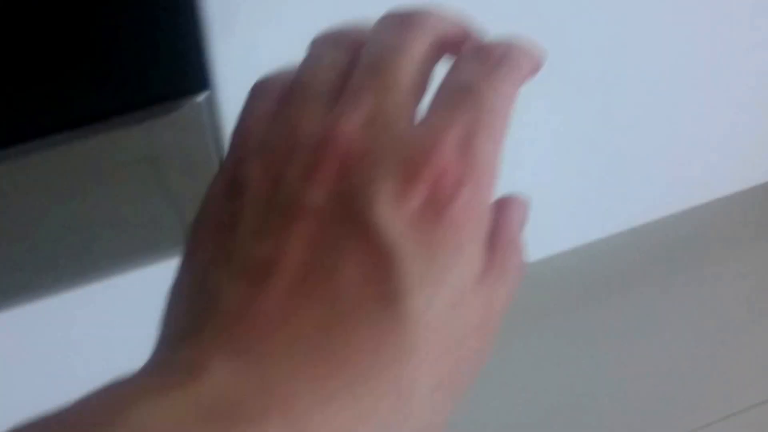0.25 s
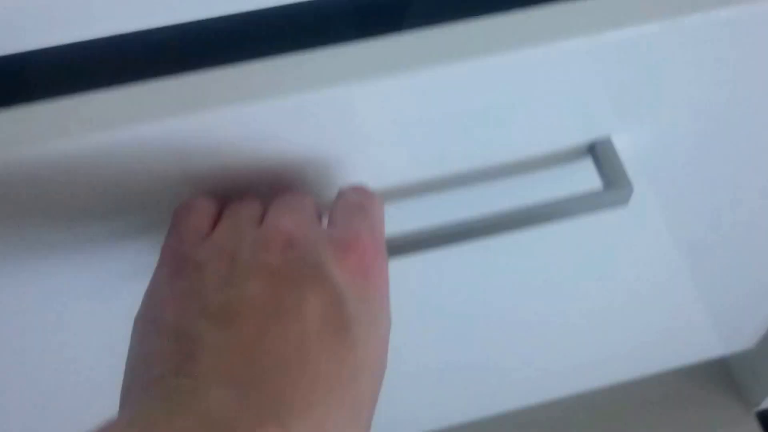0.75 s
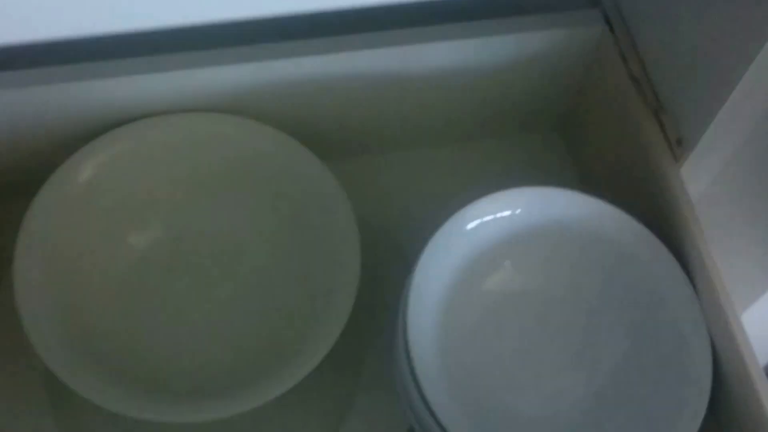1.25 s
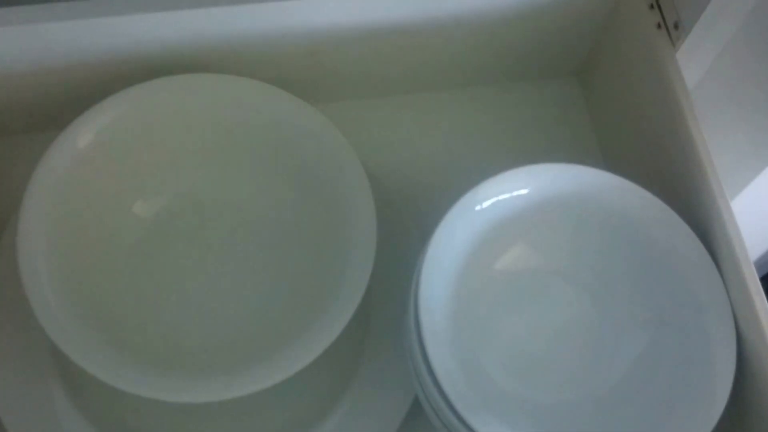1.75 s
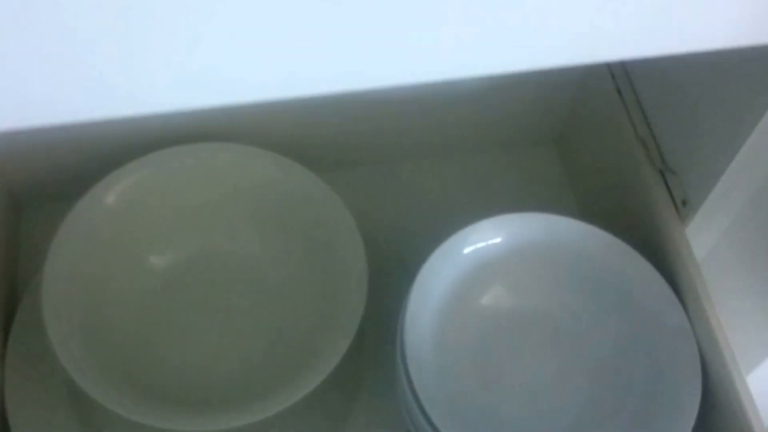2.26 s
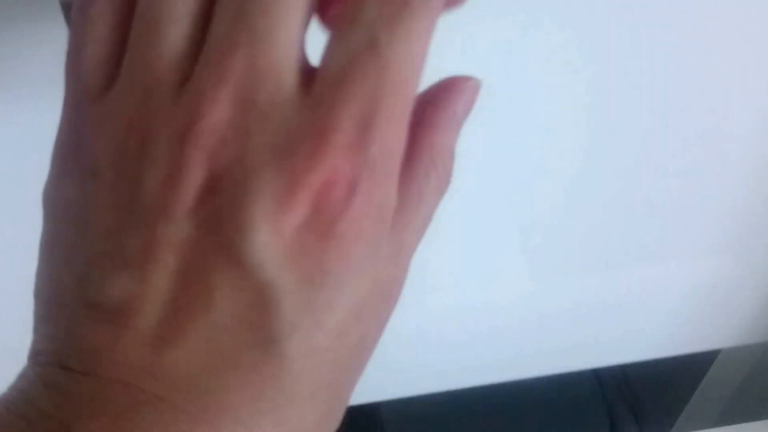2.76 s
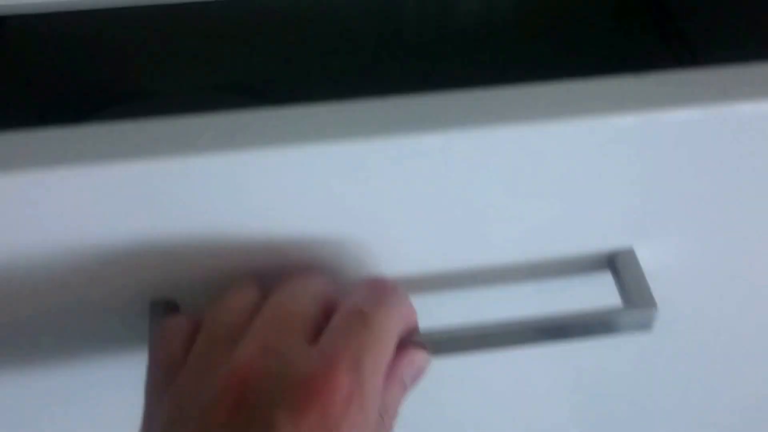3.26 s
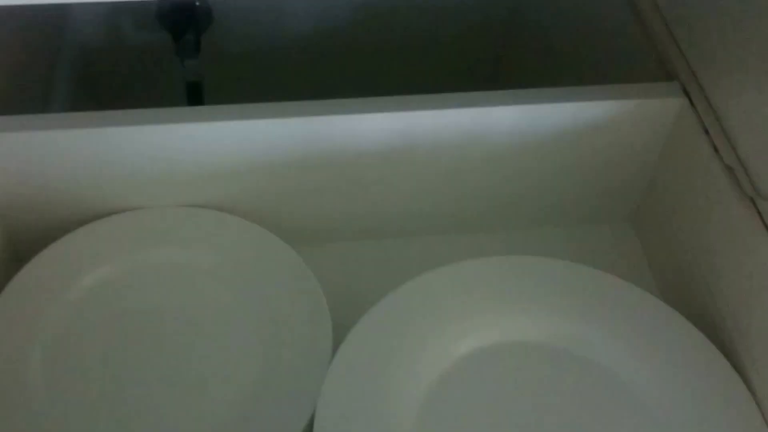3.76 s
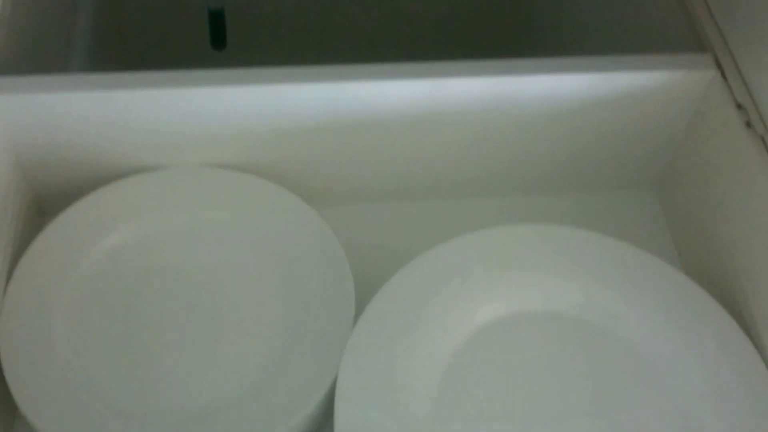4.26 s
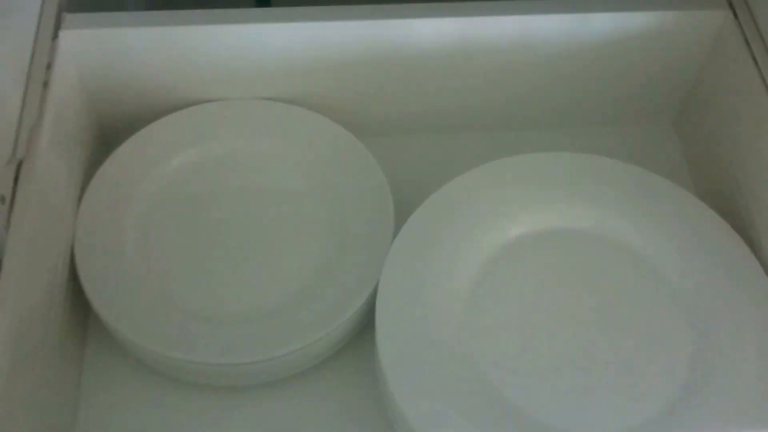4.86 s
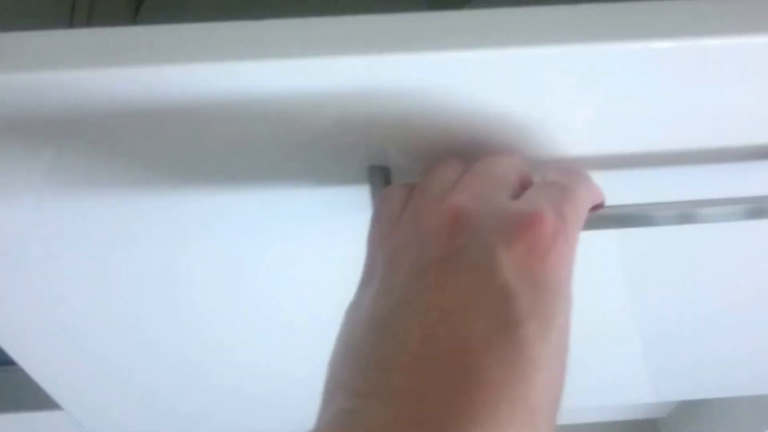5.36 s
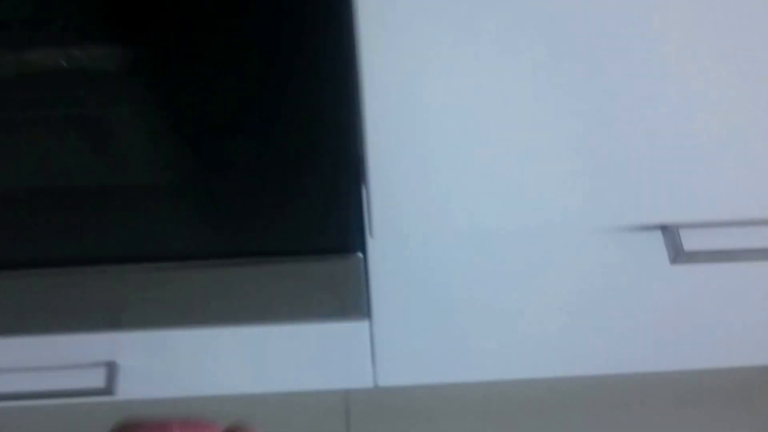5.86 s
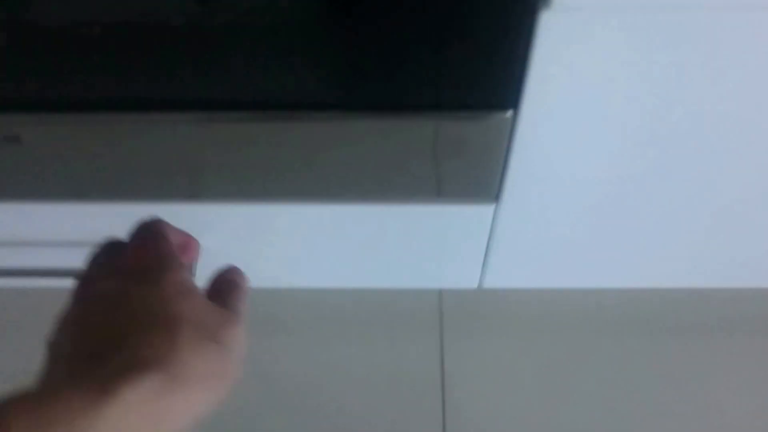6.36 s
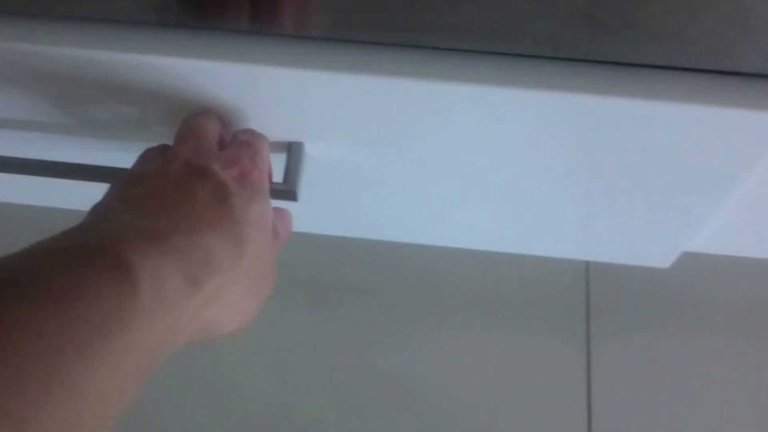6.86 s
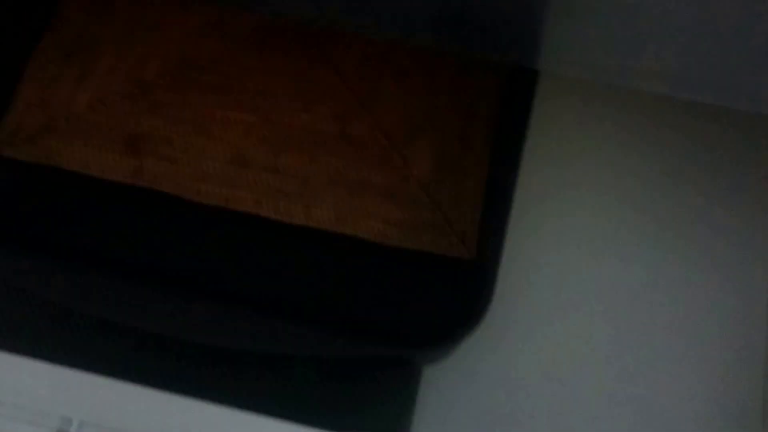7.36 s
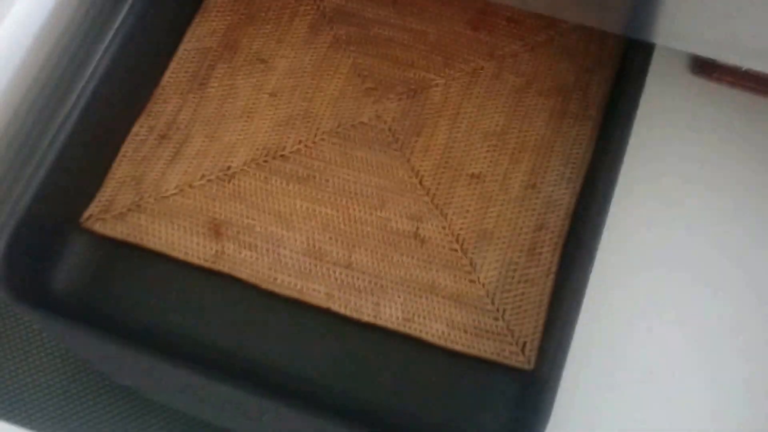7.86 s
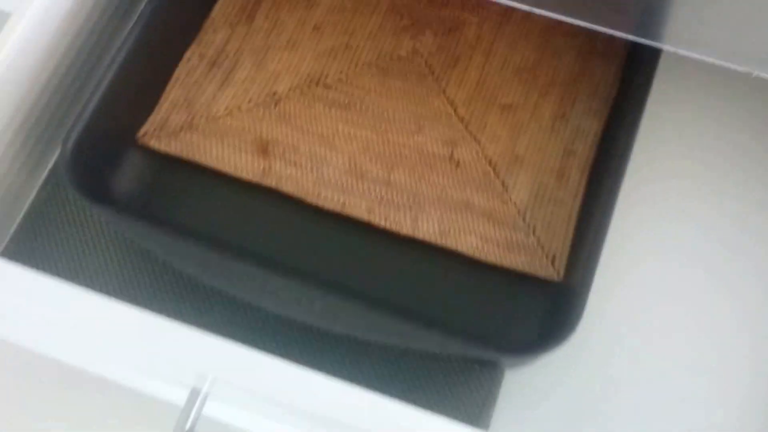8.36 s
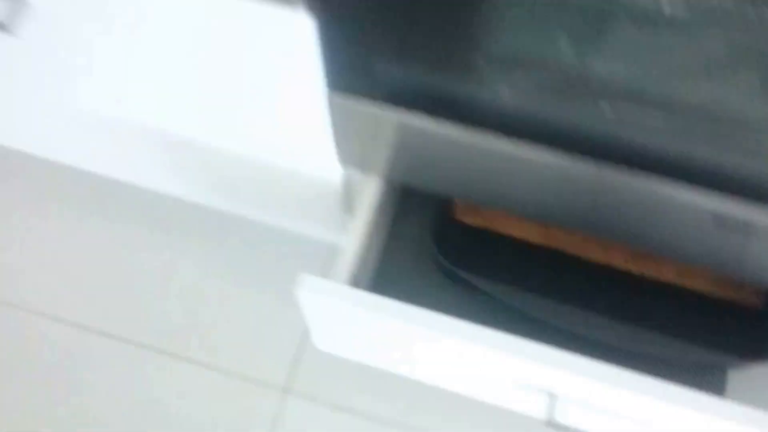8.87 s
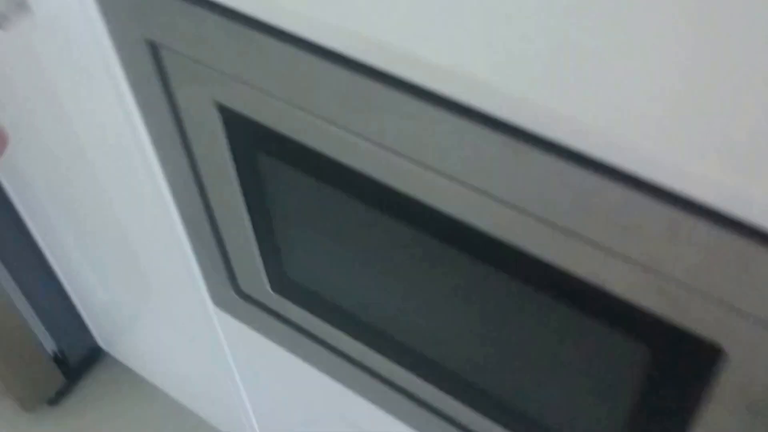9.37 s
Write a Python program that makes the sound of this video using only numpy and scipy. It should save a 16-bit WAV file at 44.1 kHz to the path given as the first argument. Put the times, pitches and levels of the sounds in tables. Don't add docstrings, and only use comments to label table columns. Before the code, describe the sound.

In a quiet, hard-walled kitchen with barely audible fridge hum, a close handheld microphone catches a heavy drawer already rolling. At 0.13-0.26 s it hits its stop in a cluster of thuds, hollow knocks and plate rattle, leaving a faint ring. Rolling resumes near 0.8, with a lighter clack at 1.1, then a bright, hard ceramic crash at 1.6 and clinking plates settling until about 2. Soft rumbling, ticks and low finger bumps on the microphone come around 2.5-2.7. At 3.1-3.2 a deeper drawer slams boomily, plates jangling; thumps follow at 3.4 and 3.65, then a quiet lull. Rolling resumes at 4.8, thumps around 5.2, and a massive low slam lands at 6.2. After a sleeve rustle, a tray drawer rumbles from 7, with thin metallic clacks and a scratch at 7.6, a sharper clack at 8.65, sliding, and a final dull double knock at 9.55.

```python
import sys
import numpy as np
from scipy import signal
from scipy.fft import rfft, irfft, next_fast_len
from scipy.io import wavfile
from scipy.ndimage import uniform_filter1d

SR = 44100
rng = np.random.default_rng(int(sys.argv[2]) if len(sys.argv) > 2 else 0)


def decibels_to_gain(level_db):
    exponent = np.asarray(level_db, float) / 20
    return 10 ** exponent


def persist_wave(psi):
    counts = np.round(np.clip(psi, -1, 1) * 32767).astype(np.int16)
    wavfile.write(sys.argv[1], SR, np.atleast_2d(counts).T)


N = 423801
HZ = np.fft.rfftfreq(next_fast_len(N + SR), 1 / SR) + 1e-3
TRAYS_FROM_S = 6.5
QUARTER = np.array([[0], [np.pi / 2]])

# (frequency [Hz], rms level [dB])
FRIDGE = [(86.1, -68), (177.6, -69), (263.8, -70.5), (349.9, -76), (441.4, -77), (528, -87)]
# (frequency [Hz], density [dB per Hz])
AIR_COLOUR = [(250, -10), (500, -3), (2400, -6.5), (4000, -10), (6400, -17), (8000, -17.5), (11000, -28),
              (15500, -31)]
# (time [s], length [s], box at the start [dB], box at the end [dB], load re box [dB])
TRAVELS = [(-.05, 0.32, -35, -43, -16), (0.789, 0.36, -37, -30, -12.5), (1.155, 0.48, -33, -41, -12.5),
           (2.117, 0.31, -31.5, -36.5, -19.5), (2.396, 0.77, -37.5, -44, -14), (3.388, 0.8, -33, -49, -21),
           (4.806, 0.4, -44.5, -37, -16.5), (5.234, 0.43, -31.5, -50.5, -18),
           (5.5, 0.98, -49.5, -48.5, -15.5), (6.46, 0.89, -55.5, -64.5, -3.5),
           (7.029, 0.59, -35, -31.5, -17), (7.76, 0.36, -43.5, -49.5, -19.5),
           (8.294, 0.54, -39, -37.5, -18), (8.778, 0.73, -44.5, -40.5, -16.5)]
# (time [s], carcass [dB], box [dB], panel [dB], t60 [s])
JOLTS = [(0.132, -16.5, -34, -25.5, 1.4), (0.234, -23.5, -16.5, -14, 0.37), (1.1, -50, -39, -35.5, 5.8),
         (1.6, -15.5, -6.5, -9.5, 0.3), (1.701, -39, -27.5, -25.5, 1.4), (2.674, -27, -30, -37, 1.13),
         (3.091, -32, -27, -18.5, 0.34), (3.161, -18.5, -17.5, -16.5, 0.95),
         (3.651, -44, -28.5, -36.5, 1.4), (5.199, -49, -34, -38, 0.33), (6.207, -18, -18.5, -26, 0.51),
         (7.599, -48, -36.5, -59, .4), (8.645, -34, -26.5, -55, 0.24), (9.535, -22, -22.5, -27, 1)]
# (from time [s], frequency [Hz], width [Hz])
BOXES = [
    (0, 262, 55),
    (3.1, 192, 45),
    (6.5, 240, 140),
]
# (frequency [Hz], width [Hz], level [dB])
CARCASS = [(62.4, 18, -3), (79.6, 14, -1), (123, 73, -16)]
# (frequency [Hz], width [Hz], level [dB])
PANEL = [(421.3, 230, 28), (550, 20, 6.4), (775, 35, 10)]
# (time [s], plates [dB], metal [dB], t60 [s])
SHAKES = [(0.133, -36.5, -34.5, 1.3), (0.238, -22.5, -33, 0.31), (1.13, -34, -34.5, 0.46),
          (1.608, -58, -8.5, 0.24), (1.68, -30.5, -31, 0.96), (2.674, -43.5, -41, 0.63),
          (3.086, -30, -61.5, 0.25), (3.159, -13, -21, 0.33), (3.25, -34.5, -43, 1.43),
          (3.65, -33, -47, 0.73), (5.199, -65, -51.5, 0.94), (6.205, -29.5, -22, 0.53),
          (7.602, -50, -65, 0.22), (8.644, -43.5, -42.5, 0.46), (9.535, -35.5, -79, .6)]
# (time [s], length [s], start level [dB], end level [dB])
SLEEVE = [
    (-.05, 0.14, -62, -63.5),
    (2.298, .36, -68, -71),
    (6.45, .36, -71.5, -64.5),
    (8.33, 0.25, -60.5, -71),
    (8.712, 0.294, -61, -69),
    (9.232, 0.54, -62, -66),
]
# (time [s], length [s], start level [dB], end level [dB], t60 [s])
GRIT = [
    (0.22, 0.074, -40.5, -37, 0.27),
    (7.628, 0.011, -49.5, -50, .06),
    (7.66, .01, -52, -52, .06),
    (11, .06, -52.5, -57, .3),
    (.183, .006, -45, -52.5, .06),
]
# (frequency [Hz], density [dB per Hz])
CHATTER_COLOUR = [(500, -17.5), (800, -1.5), (1300, 5), (2250, 5.5), (3500, -9.5), (6400, -17.5),
                  (11000, -38.5), (16000, -51)]
# (frequency [Hz], level [dB], t60 [s])
PLATES = [(1000, 1.5, 0.02), (1274, -4, 0.099), (1460, -3, 0.35), (1830, -2.5, 0.75), (2200, -7, 1),
          (2984, -11, 0.13), (3790, -4.5, 0.2), (6500, -12.5, 0.097)]
# (frequency [Hz], level [dB], t60 [s])
TRAYS = [(2770, 7, 0.099), (3770, 6.5, 0.14), (5185, -28, 0.03), (6780, -16, 0.027)]
# (time [s], peak level [dB], treble re peak [dB], rattle time [s])
TICKS = [(0.032, -22.5, -11, 0.003), (0.102, -29, -25, 0.0025), (0.852, -33, -18, 0.0065),
         (1.169, -27, -19, 0.0028), (1.342, -36.5, -40.5, 0.029), (1.56, -37, -19, 0.0093),
         (1.19, -25.5, -15, 0.018), (2.155, -40, -49, 0.0024), (2.261, -28.5, -32.5, 0.018),
         (2.704, -25.5, -12, 0.015), (2.395, -28, -41, 0.01), (2.417, -30.5, -10, 0.027),
         (2.459, -26, -21, 0.029), (2.556, -26.5, -13.5, 0.028), (2.624, -32.5, -34.5, 0.025),
         (3.556, -28, -15.5, 0.048), (3.732, -22, -24.5, 0.013), (3.792, -27, -11, 0.0025),
         (3.849, -41, -15.5, 0.011), (8.642, -30, -1, 0.005), (3.13, -38.5, -2.5, 0.02),
         (4.066, -47, -29.5, 0.0033), (4.125, -38.5, -29.5, 0.014), (5.172, -49, -0.5, 0.0085),
         (5.515, -41.5, -28, 0.021), (5.263, -34.5, -15.5, 0.015), (5.625, -41, -25.5, 0.01),
         (5.359, -44.5, -15.5, 0.0066), (5.75, -39, -12, 0.0099), (5.961, -45, -43.5, 0.0074)]
# (time [s], peak level [dB], treble re peak [dB], rattle time [s])
CRASHES = [(0.134, -11, -10.5, 0.017), (0.205, -5, -30, 0.005), (0.241, -14.5, -16, 0.04),
           (0.262, -17.5, -6.5, 0.06), (1.131, -23.5, 0, 0.017), (1.6, -12.5, -11, 0.026),
           (1.618, 1, -3, 0.0089), (1.636, 3.5, -25, 0.019), (1.651, -3.5, -11.5, 0.018),
           (1.666, -5, -12.5, 0.015), (2.674, -17.5, -6.5, 0.018), (3.09, -16.5, -25, 0.00853),
           (3.158, 5.5, -16.5, 0.016), (3.189, -7, -18, 0.015), (3.203, -6, -15.5, 0.017),
           (3.218, -5.5, -15, 0.012), (3.236, -11.5, -14.5, 0.0093), (3.328, -25.5, -16, 0.058),
           (3.647, -22, -8.5, 0.022), (3.663, -21.5, -14, 0.049), (5.203, -28.5, -22.5, 0.035),
           (6.201, -7.5, -16, 0.016), (6.21, 4, -21, 0.009), (6.235, -5.5, -9, 0.025),
           (6.331, -23.5, -10.5, 0.073), (8.647, -19, -4, 0.011), (8.676, -27.5, -0.5, 0.0155),
           (9.534, -18, -8.5, 0.0184), (9.565, -21, -12.5, 0.016)]
# (time [s], peak level [dB], treble re peak [dB], rattle time [s])
TRAY_TICKS = [(6.737, -41.5, -7, 0.055), (6.764, -54.5, 14, 0.018), (6.854, -38.5, -7.5, 0.011),
              (7.058, -42, -9.5, 0.056), (7.316, -38.5, -10.5, 0.064), (7.466, -43, -4, 0.006),
              (7.594, -23.5, -12.5, 0.016), (7.631, -23, 1, 0.0086), (7.663, -25.5, 1, 0.0089),
              (7.695, -28, -1.5, 0.013), (8.2, -40, -25.5, 0.013), (8.362, -37.5, -19, 0.035),
              (8.402, -31, -11, 0.0061), (8.571, -28.5, -13, 0.0063), (8.585, -33, -10, 0.0074),
              (8.76, -36, -3, 0.014), (9.232, -42.5, -6, 0.028), (9.268, -34, -32, 0.008),
              (9.445, -45.5, 8, 0.0059), (9.498, -51, 12, 0.005)]
# (frequency [Hz], density [dB per Hz])
CRASH_COLOUR = [(200, -28.5), (350, -8), (600, -5.5), (2100, -0.5), (4500, -11.5), (7000, -20),
                (11000, -37.5), (15500, -41)]
# (frequency [Hz], t60 [s])
ROOM_T60 = [(100, 0.33), (1000, 0.63), (4000, 0.6), (12000, 0.19)]
# (time [s], peak level [dB], pitch [Hz], t60 [s])
KNOCKS = [(.135, -17, 775, 0.1), (.137, -29, 1000, 0.52), (0.205, -15.5, 310, 0.13), (.205, -24, 1103, 0.1),
          (0.263, -13.5, 550, 0.16), (.78, -20.5, 321.4, 0.19), (3.091, -4.5, 547, 0.1),
          (3.09, -14, 806, 0.039), (3.108, -14.5, 537, 0.076), (5.203, -34, 707, 0.053),
          (5.205, -29.5, 487, 0.13), (5.276, -37.5, 800, 0.053), (6.212, -12, 1084, 0.044),
          (6.232, -14, 376, 0.16), (3.09, -10, 364, 0.12), (5.961, -44, 1146, 0.056),
          (0.254, -23, 1772, 0.09), (.26, -15.5, 844, 0.17), (.285, -17.5, 1035, 0.081),
          (6.21, -3, 483, 0.066), (6.212, -6, 810, 0.039), (6.204, 7, 274, 0.029),
          (9.566, -30.5, 434, 0.17),
          (0.15, -25, 980, 0.057), (0.179, -28, 980, 0.05), (1.08, -23, 440, 0.07),
           (1.313, -30.5, 1100, 0.034), (1.638, -6, 603, 0.13), (1.65, -17, 1170, 0.041),
           (1.852, -21, 630, 0.05), (1.914, -23.5, 680, 0.041), (1.949, -27.5, 594, 0.07),
           (2.22, -27.5, 435, 0.071), (2.684, -22, 470, 0.065), (2.695, -29.5, 843, 0.14),
           (3.132, -9.5, 359, 0.2), (3.16, -14.5, 1206, 0.068), (3.16, -12, 800, 0.046),
           (3.185, -13.5, 586, 0.057), (3.208, -9.5, 1046, 0.042), (3.667, -23.5, 572, 0.12),
           (5.432, -44, 904, 0.046), (7.203, -30, 462, 0.095), (7.274, -30, 360, 0.05),
           (7.396, -31, 557, 0.058), (7.421, -31.5, 342, 0.05), (7.477, -30, 564, 0.074),
           (7.566, -30, 570, 0.05), (7.596, -20, 393, 0.045), (7.665, -25, 405, 0.04),
           (7.778, -37.5, 596, 0.075), (9.535, -28, 969, 0.05), (9.568, -23, 864, 0.079),
           (9.573, -20, 430, 0.14), (9.574, -27.5, 1180, 0.068)]
# (time [s], peak level [dB], pitch [Hz])
THUDS = [(0.136, -9.5, 102.6), (0.206, -9.5, 81.3), (0.243, -8, 112.6), (0.782, -27.5, 295),
         (1.135, -14.5, 259.2), (1.601, -1, 257), (1.618, -4.5, 502), (2.672, -19, 199), (3.093, -8.5, 367),
         (3.159, 5.5, 91.2), (3.383, -12, 187), (3.646, -6, 191.6), (5.031, -14.5, 194), (5.193, -11, 192),
         (6.203, -1.5, 84), (6.215, 5, 113), (7.087, -14, 116), (7.594, -14, 209), (7.632, -12, 222),
         (8.647, -12, 253.2), (9.536, -11.5, 98), (9.566, -14, 53.03)]
# (time [s], level [dB], t60 [s])
GRIP = [
    (.14, -31.5, 0.68),
    (2.56, -36.5, 0.59),
    (8.95, -45, 0.85),
]
# (time [s], peak level [dB], pitch [Hz], t60 [s])
CLINKS = [(0.205, -19.5, 1796, 0.04), (0.243, -14, 1413, 0.061), (0.271, -13, 1793, 0.06),
          (1.134, -26, 5450, 0.066), (1.618, -15.5, 1674, 0.12), (1.621, -17, 5160, 0.05),
          (1.621, -12, 6433, 0.077), (1.628, -12, 4780, 0.056), (1.634, -3, 2154, 0.078),
          (1.635, -10, 3740, 0.048), (1.65, -13.5, 6296, 0.042), (1.654, -13, 3076, 0.088),
          (1.655, -10.5, 4485, 0.1), (1.665, -11.5, 4210, 0.075), (1.666, -11, 3790, 0.05),
          (1.697, -14, 1378, 0.046), (1.729, -25, 2170, 0.041), (1.948, -29, 2196, 0.04),
          (2.677, -27, 1325, 0.079), (3.091, -17, 2080, 0.037), (3.091, -15, 1470, 0.042),
          (3.091, -23, 3500, .05), (3.156, -5, 2266, 0.054), (3.161, -13.5, 3073, 0.086),
          (3.161, -16, 3563, 0.096), (3.166, -10, 1836, 0.031), (3.205, -19, 3185, 0.05),
          (3.216, -14, 2176, 0.039), (3.219, -14.5, 1289, 0.13), (3.662, -25, 1975, 0.061),
          (3.661, -23, 3760, 0.085), (6.209, -6.5, 1664, 0.037), (6.211, -16.5, 3075, 0.092),
          (6.213, -14.5, 2040, 0.045), (6.213, -24, 3670, 0.05), (6.238, -25, 3133, 0.05),
          (7.633, -25, 2600, 0.048), (7.632, -24, 3810, 0.034), (7.665, -35, 6100, 0.046),
          (7.666, -40, 7020, 0.053), (.277, -25.5, 4880, .04), (1.992, -37.5, 2170, 0.05),
          (2.314, -48, 7500, .12), (7.697, -33.5, 3690, 0.029), (8.648, -30.5, 1526, 0.079),
          (8.648, -14.5, 6830, 0.021), (8.678, -30, 6500, 0.044), (9.536, -26, 2520, 0.054),
          (6.251, -18, 3950, 0.056), (6.272, -26, 3800, 0.074)]
# (time [s], peak level [dB], pitch [Hz], t60 [s])
SETTLING = [(1.715, -24, 1485, .12), (1.76, -24, 1378, 0.23), (1.79, -22, 1502, 0.14),
            (1.81, -23.5, 2180, 0.052), (1.845, -26.5, 1402, 0.072), (1.912, -31.5, 2220, 0.052),
            (3.24, -12, 1271, 0.056), (3.309, -24.5, 1274, 0.17), (6.335, -32, 6390, 0.11),
            (6.25, -17, 2940, .08), (6.34, -31, 1920, 0.13)]
# (time [s], peak level [dB], pitch [Hz], t60 [s])
HANDLES = [
    (0.44, -34.5, 468, 2.1),
    (0.57, -44.5, 970, 1.1),
    (.3, -33, 180, 2.07),
]
# (time [s], peak level [dB], pitch [Hz], t60 [s])
BUMPS = [
    (2.536, -11.5, 80.5, 0.073),
    (2.578, -32, 85, 0.23),
    (2.616, -22, 72.4, 0.084),
    (2.655, -17, 88, 0.098),
    (9.036, -34, 88, 0.27),
    (9.177, -38, 57, 0.22),
]
# (frequency [Hz], difference over sum [dB])
PORTS = [(40, 24), (125, 16.5), (250, 19.5), (500, 13.5), (1000, 6), (2000, -1), (12000, 0)]
# (frequency [Hz], phase [rad])
TURNS = [(900, 3.0), (1900, 2.0), (2700, 3.74)]
# (frequency [Hz], level [dB])
MICROPHONE = [(3500, -1), (5100, -4.5), (6300, 2.5), (8000, 1), (15500, 2)]


def rms_one(x):
    return x / np.sqrt(np.mean(x ** 2, axis=-1, keepdims=True) + 1e-20)


def at_hz(points):
    hz, value = np.array(points).T
    return np.interp(np.log(HZ), np.log(hz), value)


def shaped(x, response):
    size = 2 * len(HZ) - 2
    return irfft(rfft(x, size) * response, size)[..., :N]


def band(x, low_hz, high_hz, order=2):
    edges_hz = [low_hz, min(high_hz, .45 * SR)]
    return signal.sosfilt(signal.butter(order, edges_hz, "band", fs=SR, output="sos"), x)


def ring(clicks, hz, t60):
    r, w = decibels_to_gain(-60 / (max(t60, .005) * SR)), 2 * np.pi * hz / SR
    return signal.lfilter([0, np.sin(w)], [1, -2 * r * np.cos(w), r * r], clicks + 1e-18)


def resonance(x, hz, width_hz):
    r = np.exp(-np.pi * width_hz / SR)
    poles = [1, -2 * r * np.cos(2 * np.pi * hz / SR), r * r]
    return signal.lfilter([(1 - r * r) / 2, 0, (r * r - 1) / 2], poles, x)


def grains(per_s, spread_db):
    sizes = decibels_to_gain(spread_db * np.minimum(rng.exponential(1, (2, N)), 4)) * rng.choice([-1, 1], (2, N))
    return rms_one(sizes * (rng.random((2, N)) < per_s / SR))


def lumps(rate_hz, depth_db):
    every = 40
    r = np.exp(-2 * np.pi * rate_hz * every / SR)
    slow = signal.lfilter([1], [1, -2 * r, r * r], rng.standard_normal(N // every + 2002))[2000:]
    return decibels_to_gain(depth_db * np.interp(np.arange(N) / every, np.arange(len(slow)), rms_one(slow)))


def swells(rise_s, rows):
    t, power = np.arange(-2, N // 40 + 2) * 40 / SR, 1e-16
    for s, length, start_db, end_db, t60 in rows:
        held_db = start_db + (end_db - start_db) * np.clip((t - s) / (length + 1e-6), 0, 1)
        db = held_db - 60 * np.maximum(t - s - length, 0) / max(t60, .05)
        rise = np.clip((t - s) / max(rise_s, .002), 0, 1)
        power = power + (rise * decibels_to_gain(db)) ** 2
    return np.interp(np.arange(N) / SR, t, np.sqrt(power))


def struck(rise_s, rows):
    return swells(rise_s, [(s, rise_s, db, db, t60) for s, db, t60 in rows])


def travel(loaded):
    rows = [(s, length, a + loaded * load, b + loaded * load, 0.94) for s, length, a, b, load in TRAVELS]
    return swells(.1, rows)


def fridge():
    motor_hz = 88
    turns = motor_hz * np.arange(N) / SR + .07 * np.log(lumps(4, depth_db=8.0))
    hum = 0
    for hz, db in FRIDGE:
        wave = np.sin(2 * np.pi * round(hz / motor_hz) * turns)
        hum = hum + np.sqrt(2) * decibels_to_gain(db) * lumps(10, depth_db=2.5) * wave
    return hum * np.array([[decibels_to_gain(2.0)], [.5]])


def room_air():
    return decibels_to_gain(-64.5) * rms_one(shaped(rng.standard_normal((2, N)), decibels_to_gain(at_hz(AIR_COLOUR))))


def cabinet():
    rolling = travel(loaded=False)
    carcass_jolt, box_jolt, panel_jolt = [struck(0.015, np.array(JOLTS)[:, [0, k, 4]]) for k in (1, 2, 3)]
    deep_gain = np.hypot(np.hypot(decibels_to_gain(-3) * rolling, carcass_jolt), decibels_to_gain(-46))
    box_gain = np.hypot(rolling, box_jolt)
    panel_gain = np.hypot(decibels_to_gain(-6.5) * rolling, panel_jolt)
    bumps = band(grains(900, spread_db=2.5) * lumps(14, depth_db=1.8), 28, 1100)
    deep = sum(decibels_to_gain(db) * resonance(bumps, hz, width_hz) for hz, width_hz, db in CARCASS)
    panel = sum(decibels_to_gain(db) * resonance(bumps, hz, width_hz) for hz, width_hz, db in PANEL)
    which = np.searchsorted(np.array(BOXES)[:, 0], np.arange(N) / SR, "right") - 1
    walls = .35 * band(bumps, 130, 420)
    box = 0
    for k, (_, hz, width_hz) in enumerate(BOXES):
        box = box + (which == k) * rms_one(resonance(bumps, hz, width_hz) + walls)
    deep, box, panel = band(deep, 25, 170), band(box, 110, 480), band(panel, 380, 1200)
    late = np.arange(N) > TRAYS_FROM_S * SR
    panel = np.where(late, band(panel, 300, 740, order=1), panel)
    return deep_gain * rms_one(deep) + box_gain * box + panel_gain * rms_one(panel) * [[1], [1.4]]


def chatter():
    shake_rise_s, metal_dies, tinkle_dies = 0.032, 0.68, 0.23
    rolling = travel(loaded=True)
    sleeve = swells(0.046, [(*stroke, 0.69) for stroke in SLEEVE])
    shaken = struck(shake_rise_s, [(s, db, t60) for s, db, _, t60 in SHAKES])
    metal = struck(shake_rise_s, [(s, db, t60 * metal_dies) for s, _, db, t60 in SHAKES])
    tinkle = struck(shake_rise_s, [(s, db, t60 * tinkle_dies) for s, _, db, t60 in SHAKES])
    plates_gain = np.hypot(rolling, shaken)
    fizz_gain = np.hypot(np.hypot(decibels_to_gain(-11.5) * rolling, metal), decibels_to_gain(8.5) * sleeve)
    cloth_gain = np.hypot(np.hypot(sleeve, swells(.008, GRIT)), decibels_to_gain(-22.5) * tinkle)

    singing = 1 + sum(2.3 * decibels_to_gain(db) / (1 + 1j * (HZ - hz) * t60 / 1.5) for hz, db, t60 in PLATES)
    contacts = grains(2000, spread_db=1.8) * lumps(38, depth_db=1.5)
    tremble = shaped(contacts, singing * decibels_to_gain(at_hz(CHATTER_COLOUR)))
    plates, fizz = band(tremble, 850, 3600, order=3), band(tremble, 3600, 12000, order=3)
    late = np.arange(N) > TRAYS_FROM_S * SR
    plates = np.where(late, rms_one(band(tremble, 1300, 3200)), rms_one(plates))
    cloth = band(grains(12000, spread_db=1.5) * lumps(12, depth_db=3), 8500, 19000, order=3)
    return plates_gain * rms_one(plates) + fizz_gain * rms_one(fizz) + cloth_gain * rms_one(cloth)


def crashes():
    close_s, plate_damped_s, ring_db = .002, 0.039, -38
    dull_below_db = -22
    events = sorted(CRASHES + TICKS + TRAY_TICKS)
    t = np.arange(SR // 3) / SR
    body, upper, treble = np.zeros((3, N + SR))
    swarm = grains(5000, spread_db=0.0)
    for s, db, treble_db, rattle_s in events:
        s = s - close_s / 2
        dying = np.exp(-(t / np.clip(rattle_s, .002, .1)) ** 1.3) * np.minimum(t / close_s, 1) ** 2
        here = slice(round(s * SR), round(s * SR) + len(t))
        body[here] += decibels_to_gain(db) * dying
        upper[here] += decibels_to_gain(db + min(treble_db - dull_below_db, 0)) * dying
        treble[here] += decibels_to_gain(db + treble_db + 13.5) * dying
        swarm[:, round((s + close_s) * SR)] += 4.5
    body, upper, treble = body[:N], upper[:N], treble[:N]
    crack = rms_one(shaped(swarm, decibels_to_gain(at_hz(CRASH_COLOUR))))
    out = body * band(crack, 450, 2500) + upper * band(crack, 2500, 5000) + treble * band(crack, 4500, 12000)
    latest = np.searchsorted(np.array(events)[:, 0], np.arange(N) / SR)
    late = np.arange(N) > TRAYS_FROM_S * SR
    for modes, present in ((PLATES, ~late), (TRAYS, late)):
        for hz, db, t60 in modes:
            blow = decibels_to_gain(rng.normal(0, 4, len(events) + 1))[latest] * present
            force = body if hz < 2600 else upper if hz < 5000 else treble
            out += decibels_to_gain(ring_db + db) * ring(force * blow * swarm[0], hz, min(t60, plate_damped_s))
    return decibels_to_gain(-7.5) * out


def room(x):
    lags = rng.uniform(.011, .04, (2, 8, 1))
    wet = np.zeros((2, len(HZ)), complex)
    for k in range(8):
        loop = decibels_to_gain(-60 * lags[:, k] / at_hz(ROOM_T60)) * np.exp(-2j * np.pi * HZ * lags[:, k])
        wet += (-1) ** k * loop / (1 - loop)
    return decibels_to_gain(-22) * shaped(x, wet)


def add_at(out, s, sound):
    out[:, round(s * SR):][:, :sound.shape[1]] += sound


def panel_knocks():
    out, t = np.zeros((2, N + SR)), np.arange(SR // 2) / SR
    for s, db, hz, t60 in KNOCKS:
        envelope = decibels_to_gain(db - 60 * t / max(t60, .02)) * (1 - np.exp(-t * hz / .4)) ** 2
        add_at(out, s, envelope * np.sin(2 * np.pi * hz * t + QUARTER) * [[1], [1.6]])
    return out[:, :N]


def thuds():
    t60 = .18
    out, t = np.zeros((2, N + SR)), np.arange(SR // 2) / SR
    for s, db, hz in THUDS:
        contact_s = .008 if db < -14 else .0015
        upper = .3 * np.sin(2 * np.pi * 1.55 * hz * t) * decibels_to_gain(-80 * t / t60)
        tone = np.sin(2 * np.pi * hz * t) + upper
        envelope = decibels_to_gain(db - 5 - 60 * t / t60) * (1 - np.exp(-t / contact_s))
        add_at(out, s, envelope * tone * [[1], [.4]])
    return out[:, :N]


def grip():
    case = rms_one(band(rng.standard_normal(N) * lumps(18, depth_db=2.5), 40, 130))
    return struck(0.014, GRIP) * case


def clinks():
    rise_s = 0.0017
    out, t = np.zeros((2, N + SR)), np.arange(SR // 2) / SR
    for s, db, hz, t60 in CLINKS + SETTLING:
        envelope = decibels_to_gain(db - 60 * t / max(t60, .02)) * (1 - np.exp(-t / rise_s))
        add_at(out, s, envelope * np.sin(2 * np.pi * hz * t + QUARTER) * [[1], [.55]])
    return out[:, :N]


def handles():
    out, t = np.zeros((2, N + SR)), np.arange(SR) / SR
    buzz_db = 20 * np.log10(lumps(25, depth_db=3))[:SR]
    beat_db = 3.0 * np.sin(2 * np.pi * 11 * t)
    for s, db, hz, t60 in HANDLES:
        fade = np.minimum(t * hz / 3, 1 - t).clip(0, 1)
        tone = np.sin(2 * np.pi * hz * t)
        add_at(out, s, decibels_to_gain(db + buzz_db + beat_db - 60 * t / t60) * fade * tone * [[1], [1.2]])
    return out[:, :N]


def finger_bumps():
    out = np.zeros(N)
    for s, db, hz, t60 in BUMPS:
        since = np.maximum(np.arange(N) / SR - s, 0)
        envelope = decibels_to_gain(db - 60 * since / t60) * (1 - np.exp(-since / 0.014))
        out -= envelope * np.sin(2 * np.pi * hz * since)
    return out


def gate(x):
    below_db, slope, window_s = -56.5, 1.1, .3
    level_db = 10 * np.log10(uniform_filter1d(np.mean(x, axis=0) ** 2, int(window_s * SR)) + 1e-12)
    return x * decibels_to_gain(slope * np.minimum(level_db - below_db, 0))


def scene():
    alike = 0.45
    hits = crashes() + panel_knocks() + thuds() + clinks() + handles()
    near = hits + room(hits[0]) + cabinet() + chatter()
    paths = [alike * np.exp(1j * at_hz(TURNS)), np.sqrt(1 - alike ** 2) + 0 * HZ]
    total = shaped(near, decibels_to_gain(-at_hz(PORTS)) * paths).sum(axis=0)
    mid, side = fridge() + room_air() + [total + grip() + finger_bumps(), near[0]]
    return np.array([mid + side, mid - side])


def band_limit(x):
    return signal.sosfilt(signal.butter(12, 15710, fs=SR, output="sos"), x)


def record(dry):
    heard = gate(shaped(dry, decibels_to_gain(at_hz(MICROPHONE)))) - .0008
    mix = 1.03 * np.tanh(heard / 0.85)
    return band_limit(mix)


dry = scene()
out = record(dry)
persist_wave(out)
```